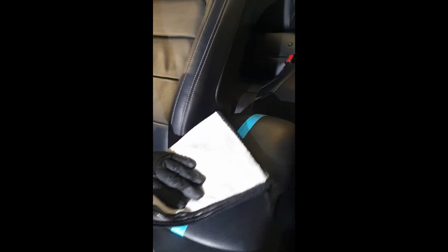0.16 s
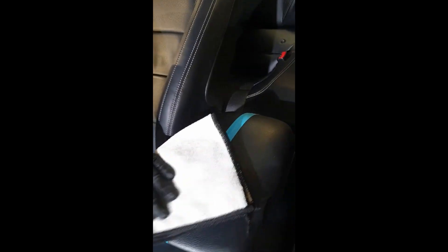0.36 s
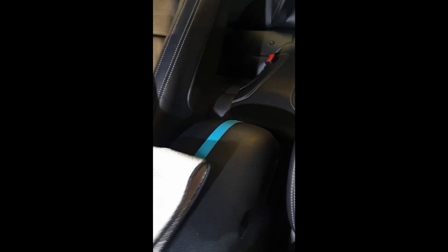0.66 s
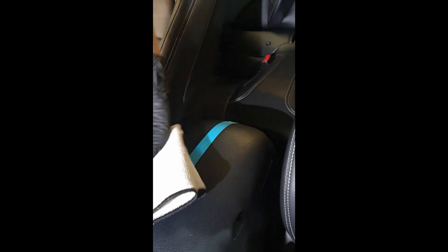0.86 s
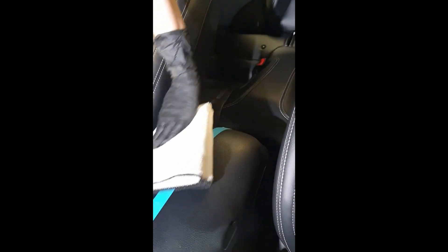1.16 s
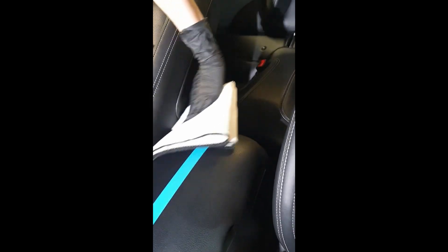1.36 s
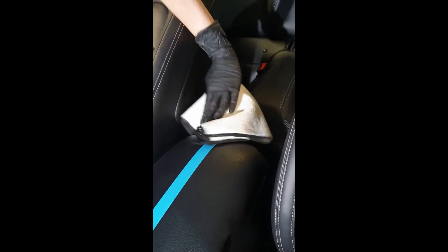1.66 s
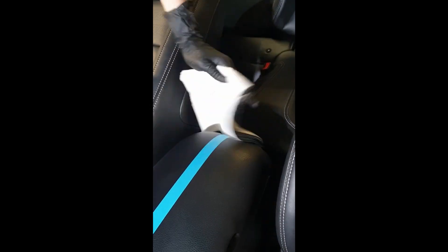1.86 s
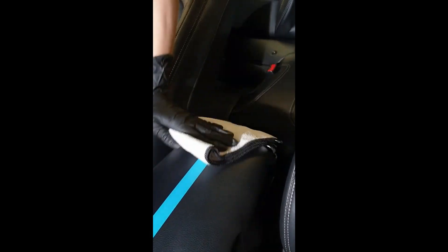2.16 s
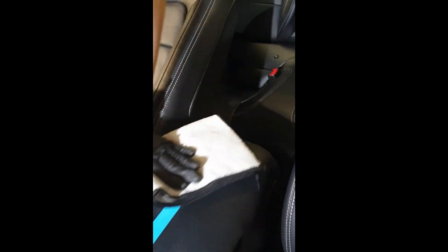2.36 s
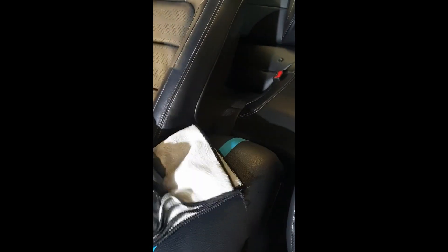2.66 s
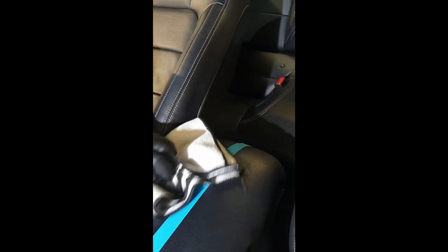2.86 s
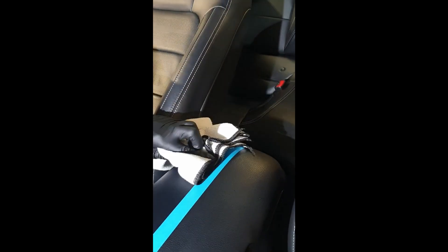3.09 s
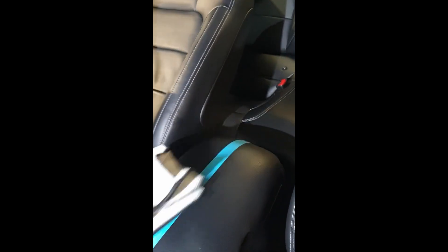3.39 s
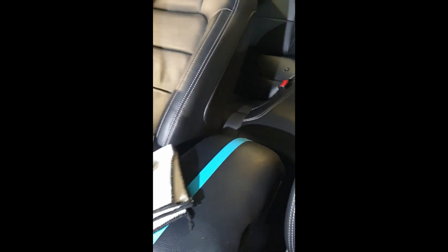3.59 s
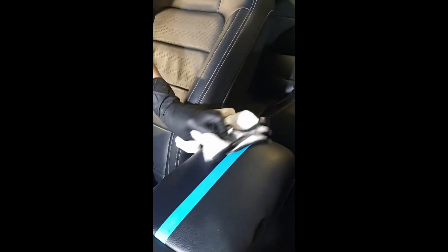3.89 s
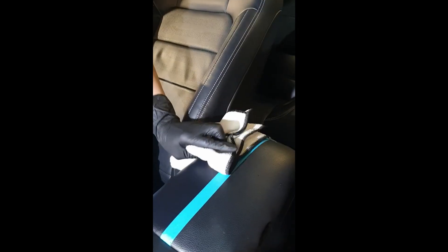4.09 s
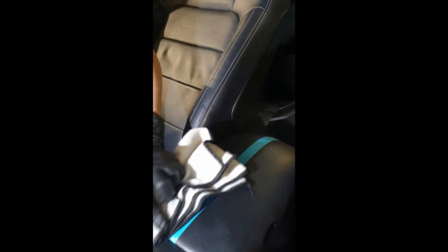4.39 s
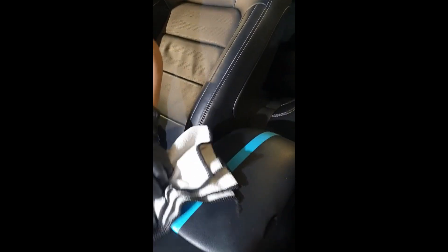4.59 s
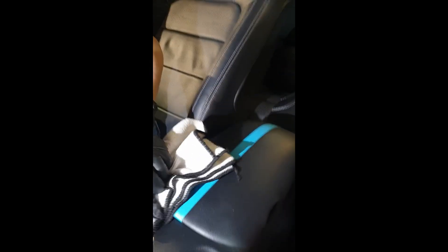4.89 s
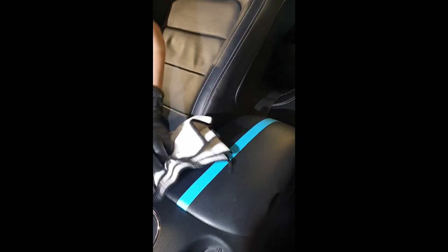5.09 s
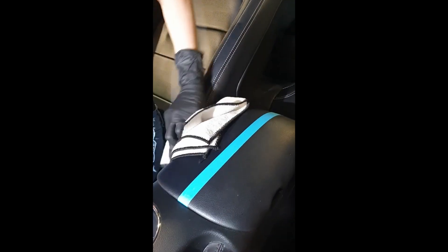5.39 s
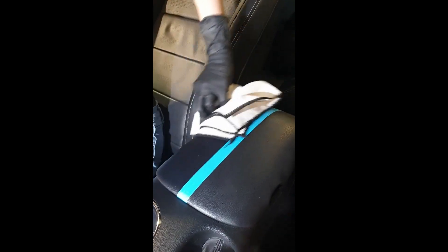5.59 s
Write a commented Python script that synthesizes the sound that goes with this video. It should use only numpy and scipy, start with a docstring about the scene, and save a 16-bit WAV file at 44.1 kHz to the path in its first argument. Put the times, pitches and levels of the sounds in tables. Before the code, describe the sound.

A soft cloth hisses in back-and-forth strokes over a leather car seat, with hard knocks at the start and scattered soft thuds.

```python
"""Hissing strokes of a microfibre cloth on a leather car seat, close to a phone in the small, dead cabin.
Random fibre slips make hiss and sheen; under pressure the palm rubs, pressed leather rasps and the cloth judders.
The gloved hand thuds on the cushion (noise rumble, decaying sines) and knocks frame, hard trim and a hollow
panel (decaying modes plus a noise tick). Faint cabin air lies beneath."""
import sys
import numpy as np
from scipy import signal
from scipy.fft import rfft, irfft, next_fast_len
from scipy.io import wavfile
from scipy.ndimage import uniform_filter1d

SR = 44100
rng = np.random.default_rng(int(sys.argv[2]) if len(sys.argv) > 2 else 0)


def materialize(psi):
    """Save the field psi as 16-bit PCM at rate SR to the path in sys.argv[1].

    A 1-D psi becomes a single channel; in a 2-D psi each row is a channel.
    """
    bounded = np.clip(np.atleast_2d(psi).T, -1, 1)
    quanta = np.round(bounded * 32767).astype(np.int16)
    wavfile.write(sys.argv[1], SR, quanta)


N = 253486
TIME_S = np.arange(N) / SR
EVENT_S = TIME_S[:SR // 3]  # time axis of one short sound

# Likeness of the sound at the two microphones. Each row: frequency in Hz, coherence 0 to 1.
LIKENESS = [(60, .94), (130, 0.86), (300, 0.65), (700, 0.46), (1400, 0.044), (4000, 0.014), (15000, 0.078)]


def undb(db):
    """Decibels to gain."""
    return 10 ** (np.asarray(db) / 20)


def unit(x):
    """Scale to rms 1."""
    return x / np.sqrt(np.mean(x ** 2))


def read(points, hz):
    """Interpolate a table's value on a log-frequency axis."""
    table_hz, value = np.transpose(points)
    return np.interp(np.log(hz + 1), np.log(table_hz), value)


def pan(left_minus_right_db):
    """Left and right gains of a level difference."""
    db = np.atleast_1d(left_minus_right_db)
    return undb(np.array([db, -db]) / 2)


def colour(x, spectrum, peaks=()):
    """Shape two unrelated signals into an rms-1 stereo pair with spectrum and resonances, alike in the bass."""
    length = x.shape[1]
    size = next_fast_len(length)
    hz = np.arange(size // 2 + 1) * SR / size
    gain = undb(read(spectrum, hz))
    for centre_hz, width_hz, db in peaks:
        gain = gain + undb(db) / (1 + (2 * (hz - centre_hz) / width_hz) ** 2)
    coherence = np.clip(read(LIKENESS, hz), 0, 1)
    shares = np.sqrt([1 + coherence, 1 - coherence])
    mid, side = irfft(rfft(x, size) * gain * shares, size)[:, :length]
    return unit(np.array([mid + side, mid - side]))


def walk(rate_hz):
    """Slow random wander about zero with a spread near 1."""
    step = int(SR / rate_hz)
    held = np.repeat(rng.standard_normal(N // step + 1), step)
    return 1.2 * uniform_filter1d(held, step)[:N]


def slips(rate_hz, spread_db):
    """Tiny releases at random moments, a few much larger than the rest."""
    happens = rng.random(N) < rate_hz / SR
    sizes = undb(spread_db * rng.standard_normal(N))
    return happens * sizes * rng.standard_normal((2, N))


def efforts(moves, levels_db, law):
    """Level of moves swinging from rest to full speed and back, as a power of speed; overlaps add in power."""
    cloth_lag_s = 0.035  # the limp cloth smooths every start and stop
    power = np.zeros(N)
    for (peak_s, rise_s, fall_s, *_), db in zip(moves, levels_db):
        corners_s = [peak_s - rise_s, peak_s, peak_s + fall_s]
        span = slice(*np.searchsorted(TIME_S, [corners_s[0], corners_s[-1]]))
        phase = np.interp(TIME_S[span], corners_s, [-1, 0, 1])
        speed = np.cos(np.pi / 2 * phase)
        power[span] += (undb(db) * speed ** law) ** 2
    return uniform_filter1d(np.sqrt(power), int(cloth_lag_s * SR))


def press(swell_s):
    """Force of a soft contact: peaks at 1 after swell_s and eases off."""
    push = EVENT_S / max(swell_s, .002)
    return push * np.exp(1 - push)


def fade(t60_s):
    """Exponential decay by 60 dB in t60_s."""
    return np.exp(-np.log(1000) * EVENT_S / t60_s)


def burst(spectrum, envelope):
    """Short coloured noise."""
    return colour(rng.standard_normal((2, len(EVENT_S))), spectrum) * envelope


def ring(modes, scatter_db, detune, tilt_db=0):
    """Struck part: each blow reweights and detunes the modes; high modes reach the microphones out of step."""
    hz, db, t60_s = np.transpose(modes)
    size, shift, lag = rng.standard_normal((len(hz), 3)).T
    apart_rad = .5 * np.sign(lag) * np.arccos(np.clip(read(LIKENESS, hz), 0, 1))
    side_phase = np.exp(1j * np.outer([.5, -.5], apart_rad))
    polarity = (-1) ** np.arange(len(hz))  # neighbouring modes push the air in opposite directions
    octaves = np.log2(hz / np.median(hz))
    weights = polarity * undb(db + scatter_db * size + tilt_db * octaves) * side_phase
    poles = 2j * np.pi * hz * (1 + detune * shift) - np.log(1000) / t60_s
    onset = 1 - np.exp(-EVENT_S / 0.00076)
    return (weights @ np.exp(np.outer(poles, EVENT_S))).imag * onset


def tick():
    """Crack of a hard contact and its brief wash round the cabin."""
    # Each row: frequency in Hz, relative level in dB.
    crack_spectrum = [(300, 14), (1000, -11.5), (2000, 4), (3200, 0), (5200, -2.5), (7000, -7),
                      (11000, -5.5), (15500, -7)]
    decay = fade(0.032) + undb(-22) * fade(0.2)  # crack, then cabin
    onset = 1 - np.exp(-EVENT_S / 0.00043)
    return burst(crack_spectrum, decay * onset) * pan(1.7) / 2


def thump(hz, swell_s):
    """Padding gives way and springs back for a few cycles; the cabin booms on at its own low note."""
    boom_hz, boom_db, boom_t60_s = 55, -17, 0.89
    overtone_ratio, overtone_db = 1.85, -12
    cycle = 2 * np.pi * hz * EVENT_S
    padding = press(swell_s) * (np.sin(cycle) + undb(overtone_db) * np.sin(overtone_ratio * cycle))
    boom_envelope = (1 - np.exp(-EVENT_S * boom_hz)) * fade(boom_t60_s)
    boom_envelope = boom_envelope * (1 - EVENT_S / EVENT_S[-1])  # ends at zero
    boom = boom_envelope * np.sin(2 * np.pi * boom_hz * EVENT_S)
    return (padding + undb(boom_db) * boom) * pan(1.8)


def add(out, start_s, sound):
    """Mix a short sound in at a time."""
    start = max(int(start_s * SR), 0)
    out[:, start:start + len(EVENT_S)] += sound[:, :N - start]


def cabin_air():
    """Still air of the cabin: steady coloured noise."""
    # Each row: frequency in Hz, relative level in dB.
    air_spectrum = [(20, -21.5), (55, 1.5), (120, -20), (250, -30.5), (500, -29.5), (1200, -33),
                    (3000, -39), (15500, -45.5)]
    return undb(-57) * colour(rng.standard_normal((2, N)), air_spectrum)


def cushion():
    """The seat rumbles under the moving hand, and thuds and scuffs where the hand lands."""
    # Weight of the hand. Each row: time in seconds, rumble level in dB before its wander.
    weight = [(.09, -46), (.44, -37), (.6, -53.5), (.92, -64.5), (1.15, -53), (1.45, -64.5), (2.0, -55.5),
              (2.36, -45.5), (2.66, -52.5), (3.45, -47), (4.15, -58), (5.0, -46), (5.16, -55), (5.75, -52)]
    # Soft bumps. Each row: start in seconds, thump level in dB before gain, thump frequency in Hz,
    # level of the scuffed hide in dB before gain.
    bumps = [(.001, -15, 58.2, -18.5), (.021, -18, 93, -22.5), (.047, -17.5, 59, -38),
             (.109, -26.5, 67.2, -53), (0.139, -29.5, 53.8, -64), (0.309, -20.5, 58.6, -29),
             (.36, -23.5, 59.7, -35), (1.913, -46.5, 63, -46.5), (2.028, -48, 92.4, -57),
             (2.127, -35.5, 79.6, -41.5), (2.267, -43, 138.6, -50), (2.319, -38, 64, -55),
             (2.512, -36, 101.7, -52), (2.733, -35.5, 83, -56), (2.91, -25, 107.6, -29.5),
             (3.039, -39.5, 115, -43.5), (3.262, -36.5, 102, -48), (3.571, -31.5, 55.5, -43),
             (3.908, -41.5, 75.7, -49.5), (4.057, -47, 99.6, -65), (4.606, -35.5, 65, -60),
             (4.847, -25.5, 67, -44), (5.005, -50, 103, -45.5), (5.063, -28.5, 62, -51),
             (5.256, -39.5, 76, -47.5)]
    # Rumble, then scuff of the hide. Each row: frequency in Hz, relative level in dB.
    rumble_spectrum = [(20, -37.5), (35, -13), (55, 4), (85, -4), (130, -4), (200, -12.5), (300, -18.5),
                       (450, -35), (1000, -51.5)]
    scuff_spectrum = [(70, -18.5), (150, 5), (280, -2), (380, -12.5), (550, -21), (1200, -38)]
    bump_gain_db, scuff_gain_db = 1, -6
    swell_s = 0.014  # time for the padding to give way

    weight_s, weight_db = np.transpose(weight)
    rumble_db = np.interp(TIME_S, weight_s, weight_db) + walk(6.4)
    out = colour(slips(rate_hz=400, spread_db=2), rumble_spectrum) * undb(rumble_db) * pan(1.27)
    for start_s, db, hz, scuff_db in bumps:
        add(out, start_s, undb(db + bump_gain_db) * thump(hz, swell_s))
        add(out, start_s, undb(scuff_db + scuff_gain_db) * burst(scuff_spectrum, press(swell_s)))
    return out


def frame_taps():
    """Taps through the padding ring the seat frame and its hollow body, tick and shake the seat."""
    # Each row: start in seconds, ring, tick and thump levels in dB before gain, thump frequency in Hz.
    taps = [(.284, -28, -32, -17, 111), (.331, -26.5, -34.5, -21, 124.4), (.384, -31, -42.5, -25, 68),
            (.42, -41.5, -60, -21, 67), (1.061, -49, -61, -55, 57), (2.118, -55, -72, -36.5, 128),
            (3.228, -50, -62, -49, 60.3), (3.416, -38.5, -57, -35, 107), (3.524, -41.5, -48.5, -43, 57.3),
            (4.167, -53, -65, -62, 64), (4.83, -45.5, -72, -35, 95), (5.394, -45.5, -61, -57, 56),
            (5.429, -58, -69, -42, 91)]
    # Frame, then its hollow body. Each row: frequency in Hz before detuning, relative level in dB
    # before scatter and tilt, t60 in seconds.
    frame_modes = [(524, -16, 0.057), (692, -7, 0.021), (781, -1.5, 0.044), (871, -4.5, 0.065),
                   (1080, 1.5, 0.035), (1103, -0.5, 0.034), (1274, -9, 0.039), (1532, -13.5, 0.044),
                   (2060, -8, 0.041)]
    body_modes = [(174, 1, 0.27), (223, 5, 0.046), (315, -22, 0.054), (418, -6, 0.064), (540, 1.5, 0.043)]
    ring_gain_db, tick_gain_db, thump_gain_db = -3, 10, 3
    body_under_ring_db = -15
    # softer taps ring duller: tilt in dB per octave for each dB of tick below a crisp tap's
    crisp_tick_minus_ring_db, padding_tilt = -9.5, 0.59

    out = np.zeros((2, N))
    for start_s, ring_db, tick_db, thump_db, hz in taps:
        tilt_db = padding_tilt * (tick_db - ring_db - crisp_tick_minus_ring_db)
        frame = ring(frame_modes, scatter_db=0.5, detune=0.048, tilt_db=tilt_db) * pan(0.51)
        body = ring(body_modes, scatter_db=7.5, detune=0.014)
        add(out, start_s, undb(ring_db + ring_gain_db) * (frame + undb(body_under_ring_db) * body))
        add(out, start_s, undb(tick_db + tick_gain_db) * tick())
        add(out, start_s, undb(thump_db + thump_gain_db) * thump(hz, swell_s=0.0058))
    return out


def knocks(blows, modes, scatter_db, detune, pan_db):
    """Hard contacts tick and ring the modes of the part they meet."""
    out = np.zeros((2, N))
    for start_s, ring_db, tick_db in blows:
        part = ring(modes, scatter_db, detune) * pan(pan_db)
        add(out, start_s, undb(ring_db) * part + undb(tick_db) * tick())
    return out


def trim_knocks():
    """Hard trim: short, dense modes."""
    # Each row: start in seconds, ring gain in dB, tick gain in dB.
    blows = [(0.0, -16, -15.5), (0.016, -17.5, -12), (0.0226, -14.5, -15), (0.0423, -34.5, -23.5)]
    # Each row: frequency in Hz before detuning, relative level in dB before scatter, t60 in seconds.
    modes = [(133.6, -2.5, 0.125), (193.3, -2, .07), (316, -6, 0.068), (545, -12, .06), (570, -22, .042),
             (766, -6.5, 0.025), (902, -0.5, 0.023), (970, -5, 0.036), (1116, 1, 0.032),
             (1574, -13.5, 0.06), (1976, -16.5, 0.033), (2340, -27.5, .035), (2910, -24, .05),
             (3230, -23.5, .045)]
    return knocks(blows, modes, scatter_db=1.6, detune=0.0094, pan_db=-.3)


def panel_knocks():
    """Hollow panel: its low modes ring longest."""
    # Each row: start in seconds, ring gain in dB, tick gain in dB.
    blows = [(2.8819, -20, -22.5), (2.899, -25.5, -30)]
    # Each row: frequency in Hz before detuning, relative level in dB before scatter, t60 in seconds.
    modes = [(173.6, -7.5, 0.21), (220, -5.5, .15), (284, 3, 0.078), (328.6, -1, 0.14), (519, -16, 0.1),
             (600, -14, 0.028), (866, -3, 0.053), (953, -6.5, 0.047), (1057, -6, .04), (1220, -19, 0.057),
             (1430, -8.5, 0.03), (1740, -12, 0.03), (2030, -20, 0.066)]
    return knocks(blows, modes, scatter_db=2.5, detune=0.0024, pan_db=-1.7)


def judder():
    """The bunched cloth sticks and slips in coarse steps that drum on the taut leather."""
    # Each row: hardest grip in seconds, rise in seconds, fall in seconds, level in dB before gain.
    grips = [(1.06, 0.015, 0.03, -60.5), (3.06, 0.083, 0.046, -53.5), (3.231, 0.029, 0.059, -42.5),
             (3.325, 0.068, 0.14, -38)]
    # Each row: frequency in Hz, relative level in dB.
    grip_spectrum = [(70, -22), (160, -14), (260, 0), (430, -3), (560, -28), (800, -21), (1100, -27),
                     (2500, -39.5)]
    # Each row: centre in Hz, width in Hz, relative level in dB.
    grip_peaks = [(159, 19, 11.5), (388, 12, 9), (492, 15, -1.5), (698, 52, -6.5), (790, 32, -7.5)]
    force = efforts(grips, np.transpose(grips)[-1], law=1.73)
    return colour(slips(rate_hz=450, spread_db=2.5), grip_spectrum, grip_peaks) * force * undb(1.5)


def wiping():
    """Countless fibres flick over the grain; under pressure the palm rubs and the leather rasps unevenly."""
    # Each row: fastest moment, speeding-up and slowing-down times in seconds, levels of fibre hiss,
    # top-octave sheen and leather rasp in dB before gain, left minus right in dB before the layer's pan.
    strokes = [(.255, .25, 0.044, -51, -48.5, -66, -5.5), (.42, 0.36, 0.17, -71.5, -66, -61.5, -5),
               (0.791, 0.19, 0.22, -59, -56.5, -66.5, -5.5), (.98, 0.38, 0.19, -59.5, -57, -65.5, -6),
               (1.331, 0.24, 0.27, -59.5, -58, -64.5, -4), (1.58, 0.084, 0.091, -67, -60.5, -92, -4.5),
               (1.84, 0.074, 0.17, -56.5, -51, -72, 0), (1.884, .055, 0.043, -44, -38.5, -65, 0.5),
               (2.04, 0.21, 0.21, -75.5, -67.5, -84.5, -6.5), (2.292, 0.11, 0.22, -53, -54, -53.5, -3.5),
               (2.52, 0.2, .2, -59, -60, -57.5, -1.5), (2.65, 0.086, 0.22, -66, -61.5, -68, 1),
               (2.952, 0.19, 0.21, -57.5, -56, -59, 0.5), (3.365, 0.11, 0.25, -53.5, -52, -53, -1),
               (3.56, 0.12, 0.46, -69.5, -66, -71.5, -4), (3.912, 0.22, 0.11, -58, -54.5, -53.5, 1.5),
               (4.115, 0.064, 0.05, -66.5, -60, -62, 2), (4.24, 0.14, 0.23, -84, -74, -60, 2),
               (4.414, .21, 0.19, -59, -55, -55, 1.5), (4.69, 0.079, 0.16, -63.5, -57.5, -66.5, 1),
               (4.945, 0.092, 0.097, -56, -53.5, -63.5, 2), (5.2, 0.16, 0.22, -58, -52, -72, 0.5),
               (5.63, 0.17, 0.62, -65, -60, -68.5, 1.5)]
    # Flat palm leaning in. Each row: hardest moment, rise and fall in seconds, rub level in dB.
    presses = [(.07, 0.048, 0.12, -56), (.44, .05, 0.076, -60.5), (1.09, 0.077, 0.2, -58.5),
               (1.4, 0.067, 0.16, -67), (3.03, 0.12, 0.052, -63), (3.37, 0.13, 0.23, -54),
               (3.72, 0.055, .06, -60), (3.92, 0.042, .06, -54.5), (4.41, 0.065, 0.053, -51),
               (5.38, 0.099, 0.14, -62.5), (5.61, 0.089, 0.12, -58.5)]
    # Hiss, sheen, rub and rasp spectra. Each row: frequency in Hz, relative level in dB.
    hiss_spectrum = [(300, -7.5), (1000, -10), (2500, -1), (3600, -0.5), (4900, 3), (6800, 2.5), (9000, -3),
                     (11000, -18.5), (15500, -46.5)]
    sheen_spectrum = [(5000, -30), (8000, -7.5), (10000, -3), (11200, -1.5), (13000, -4), (15500, -4.5)]
    rub_spectrum = [(120, -23.5), (300, -10.5), (500, -4.5), (750, -5.5), (1000, -5.5), (1300, -13),
                    (1800, -7), (4000, -36)]
    rasp_spectrum = [(700, -26), (1250, -9), (1500, -14), (2100, -9), (2750, -10), (3200, -12), (8000, -37)]
    # Rub and rasp resonances. Each row: centre in Hz, width in Hz, relative level in dB.
    rub_peaks = [(1000, 260, -1)]
    rasp_peaks = [(1544, 360, -3.5), (1758, 57, -7), (2453, 560, -12.5)]
    # growth with hand speed (power of speed)
    hiss_law, sheen_law, rasp_law, press_law = 1.31, 1, 1.33, 1.1
    resting_sheen_db = -71.5  # before gain; the fibres never lie quite still
    rub_under_rasp_db = -5  # the palm's share of an ordinary stroke
    sheen_gain_db = 2
    flutter_db, catch_db = 0.87, 0.54  # random level wander of fibres, of palm and leather

    *_, hiss_db, sheen_db, rasp_db, pan_db = np.transpose(strokes)
    sides_db = pan_db / 2, -pan_db / 2
    brushing = np.array([efforts(strokes, hiss_db + side_db, hiss_law) for side_db in sides_db])
    gliding = np.array([efforts(strokes, sheen_db + side_db, sheen_law) for side_db in sides_db])
    gliding = np.hypot(gliding, undb(resting_sheen_db))
    dragging = efforts(strokes, rasp_db, rasp_law)
    pressing = efforts(presses, np.transpose(presses)[-1], press_law)
    leaning = np.hypot(dragging * undb(rub_under_rasp_db), pressing)

    hiss = colour(slips(rate_hz=44000, spread_db=3), hiss_spectrum) * brushing * pan(2.9)
    sheen = colour(slips(rate_hz=62000, spread_db=1.5), sheen_spectrum) * gliding  # a slip every sample
    sheen = sheen * undb(sheen_gain_db) * pan(-2)
    rub = colour(slips(rate_hz=9600, spread_db=0.5), rub_spectrum, rub_peaks) * leaning
    rasp = colour(slips(rate_hz=7000, spread_db=1), rasp_spectrum, rasp_peaks) * dragging
    fibres = (hiss + sheen) * undb(flutter_db * walk(45))
    pressed = (rub + rasp) * undb(catch_db * walk(35)) * pan(2.7)
    return fibres + pressed


def scene():
    """All sources over the still air of the cabin."""
    contacts = cushion() + frame_taps() + trim_knocks() + panel_knocks()
    return cabin_air() + contacts + judder() + wiping()


def record(dry):
    """The phone drops the deepest bass and cuts the top."""
    bass_cut = signal.butter(4, 38, "high", fs=SR, output="sos")
    top_cut = signal.ellip(10, .2, 70, 15850, fs=SR, output="sos")  # ripple dB, stopband dB, edge Hz
    return signal.sosfilt(top_cut, signal.sosfilt(bass_cut, dry))


dry = scene()
out = record(dry)
materialize(out)
```